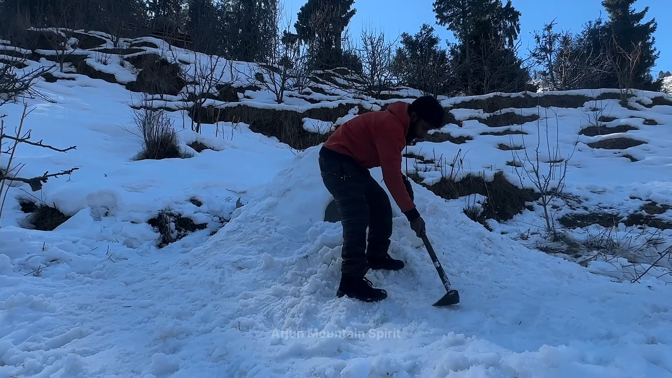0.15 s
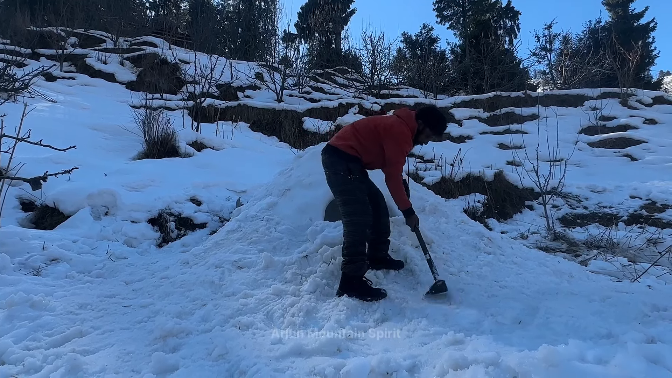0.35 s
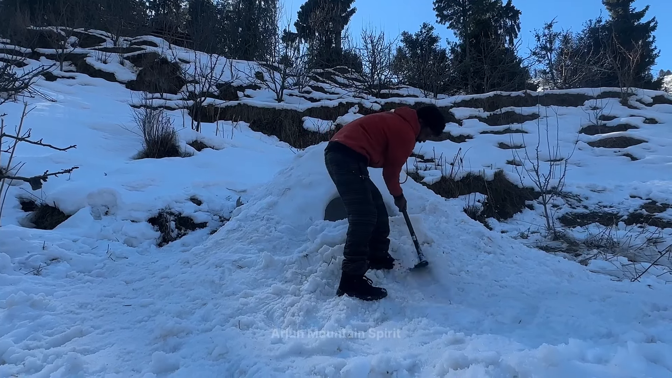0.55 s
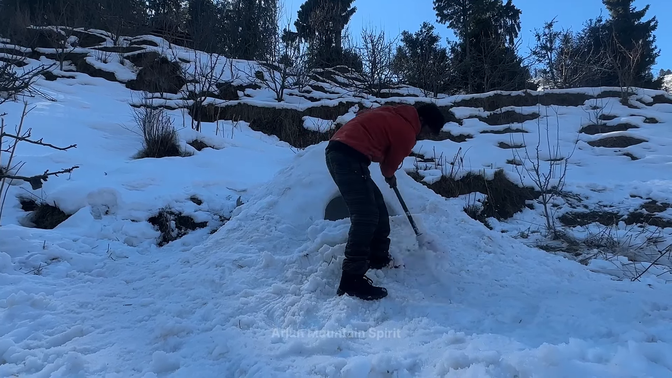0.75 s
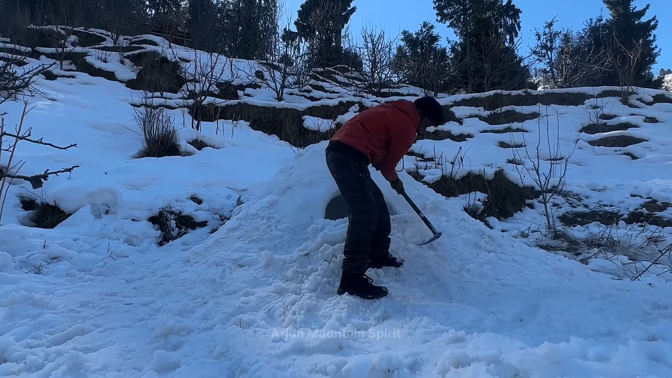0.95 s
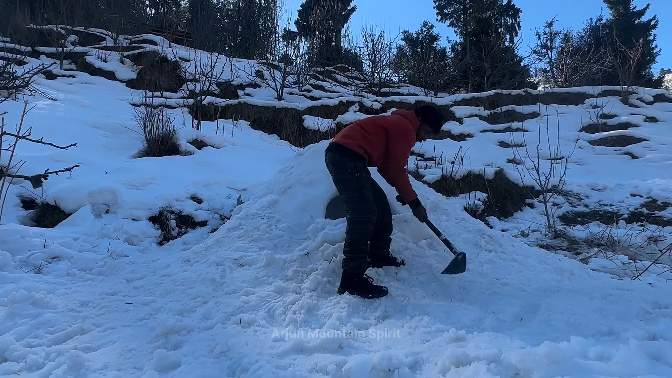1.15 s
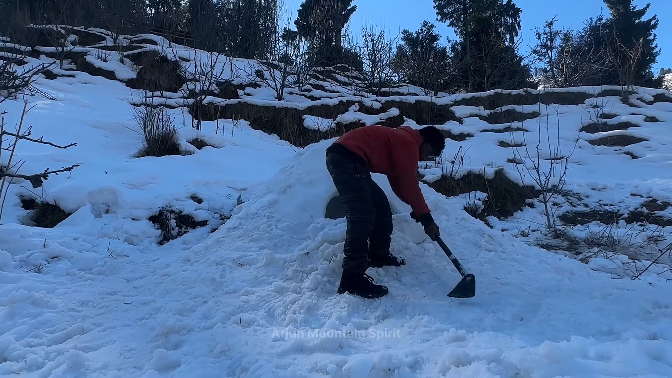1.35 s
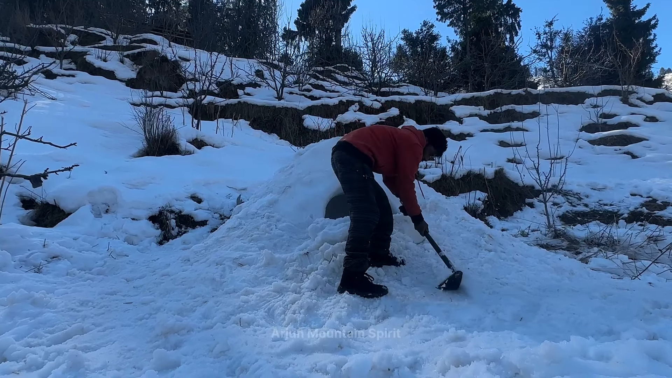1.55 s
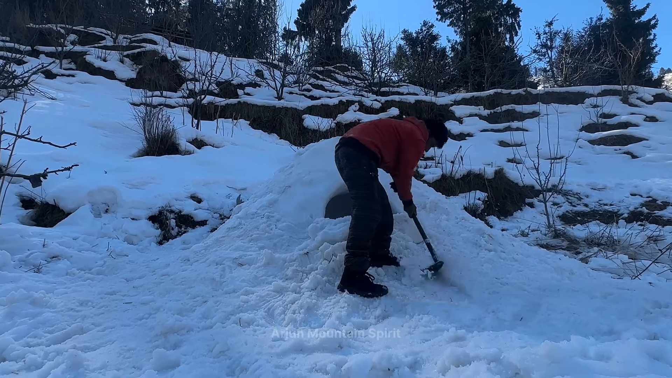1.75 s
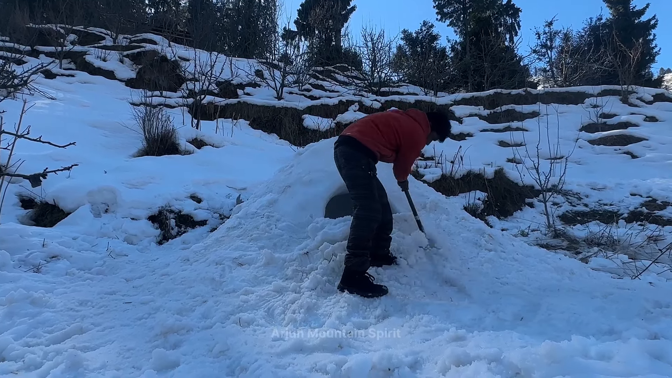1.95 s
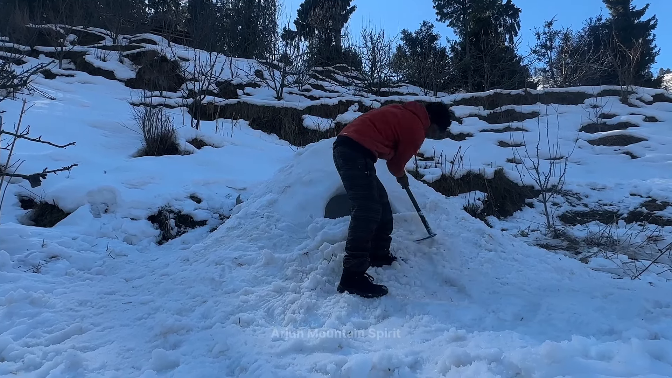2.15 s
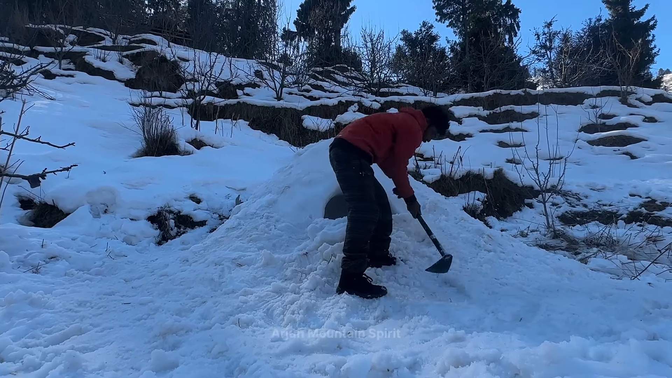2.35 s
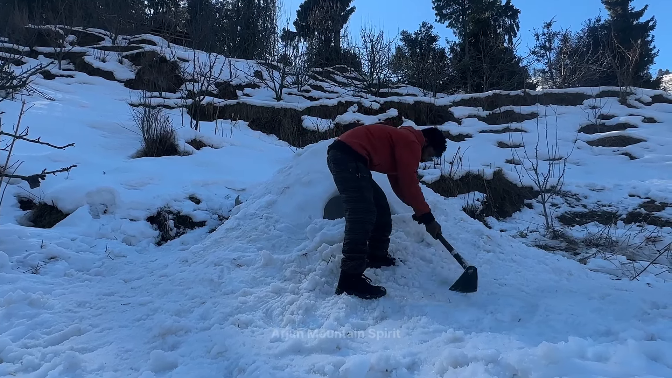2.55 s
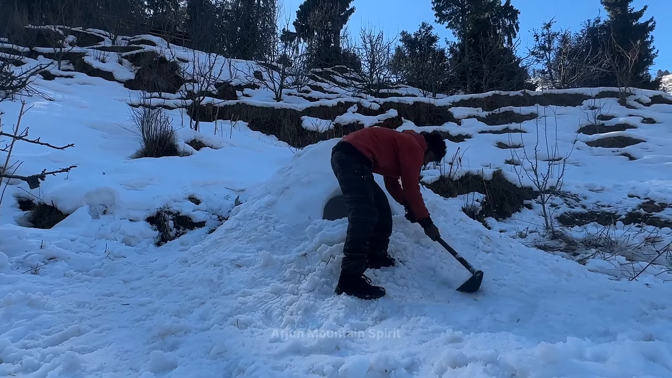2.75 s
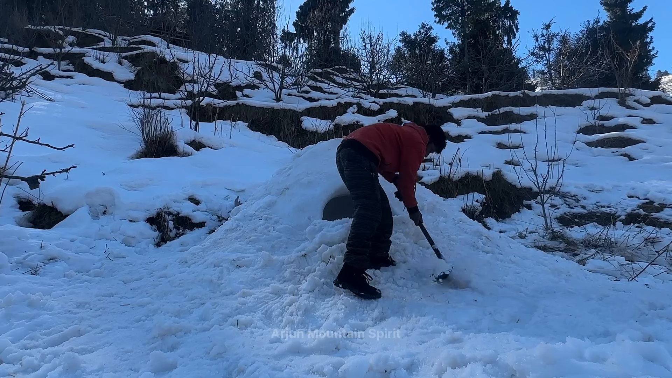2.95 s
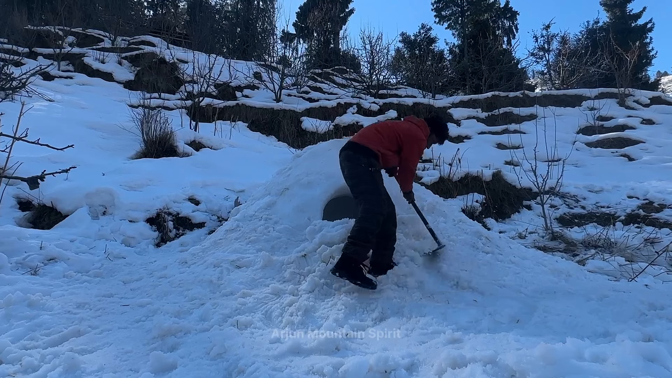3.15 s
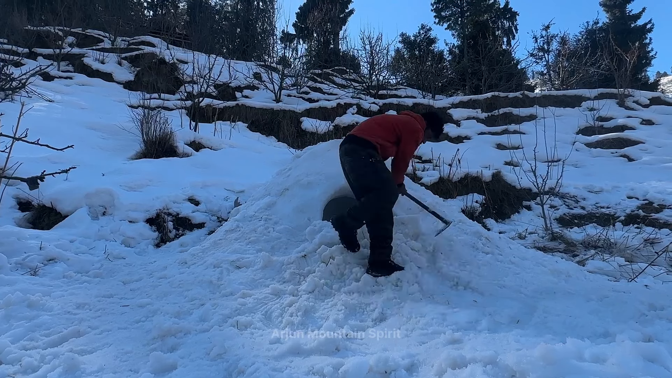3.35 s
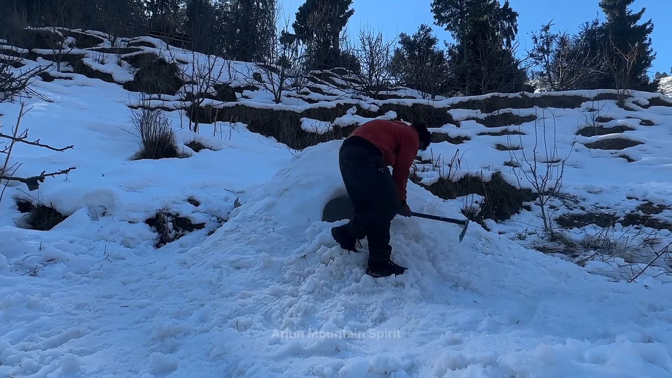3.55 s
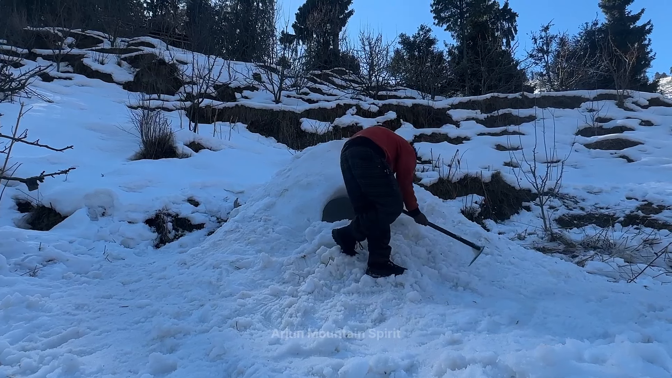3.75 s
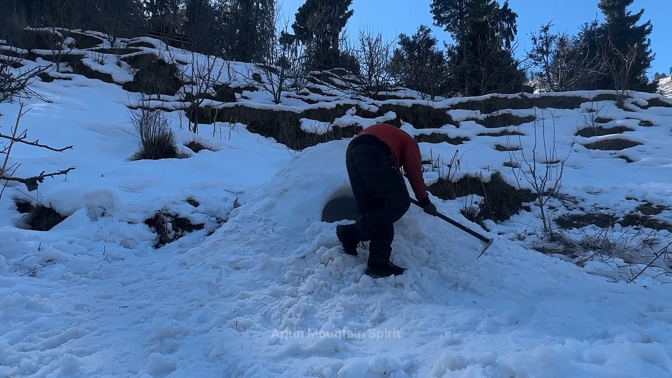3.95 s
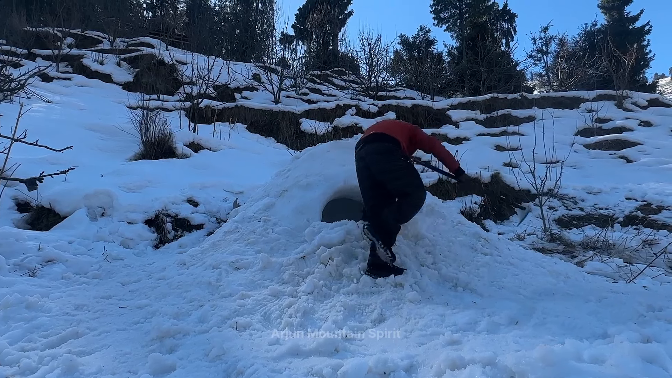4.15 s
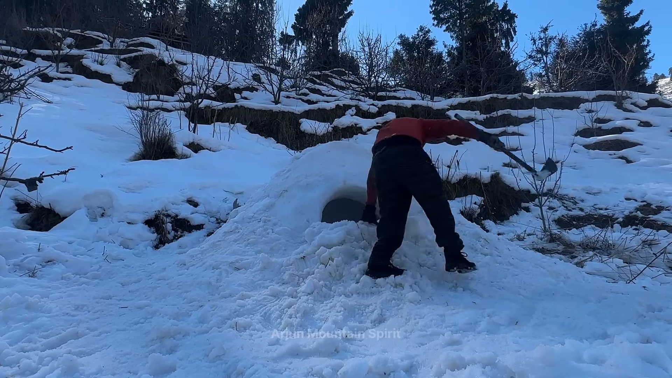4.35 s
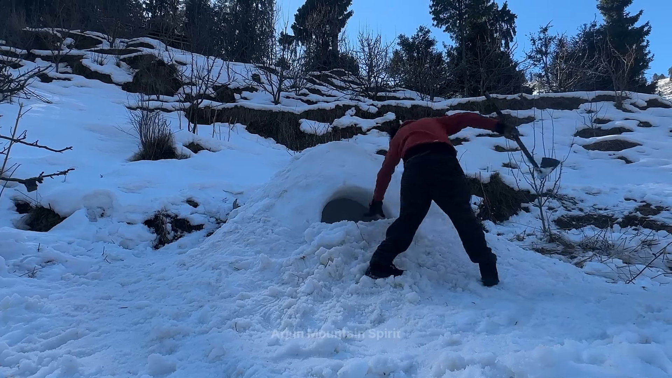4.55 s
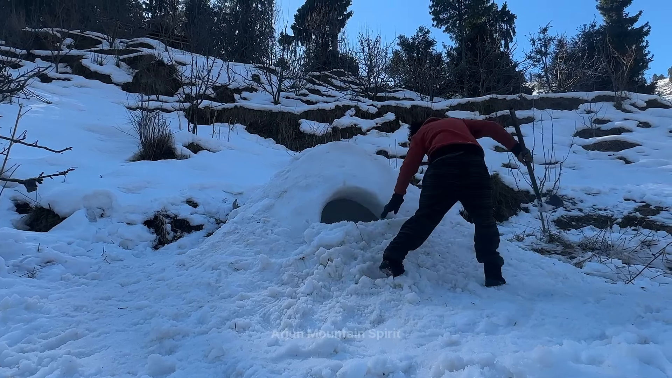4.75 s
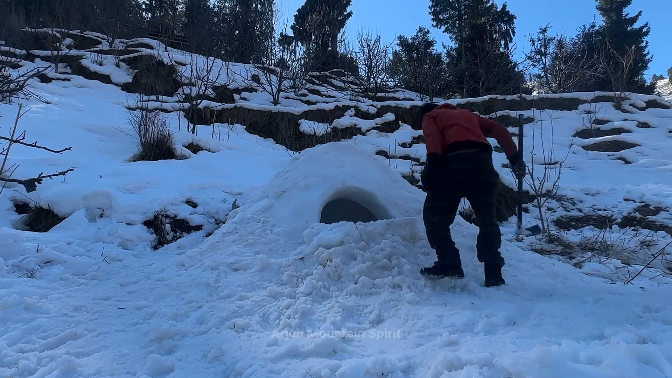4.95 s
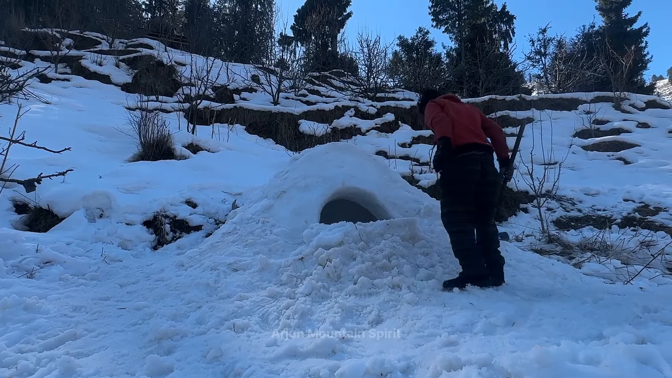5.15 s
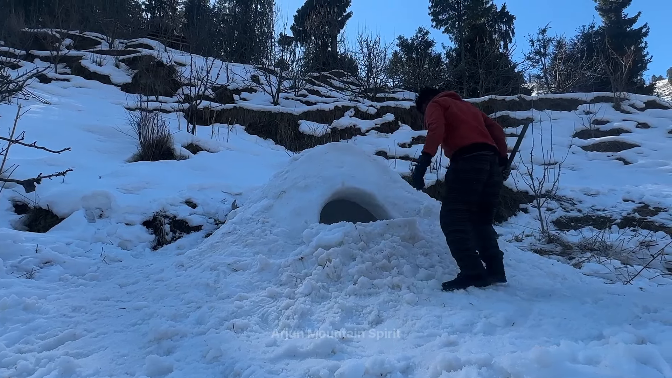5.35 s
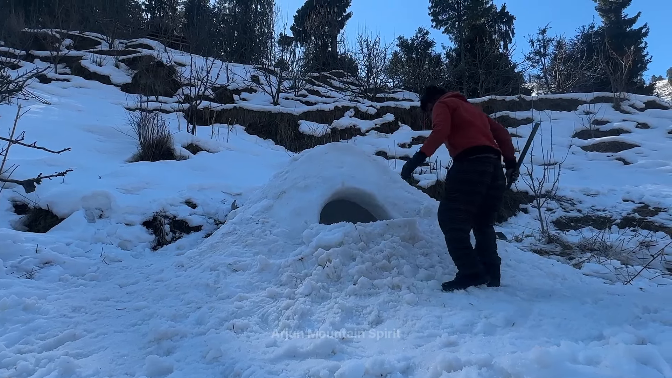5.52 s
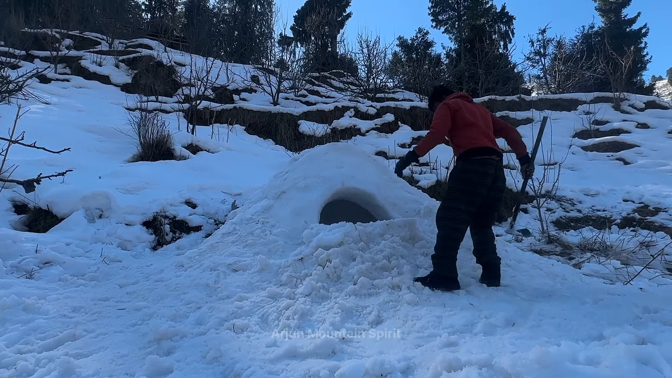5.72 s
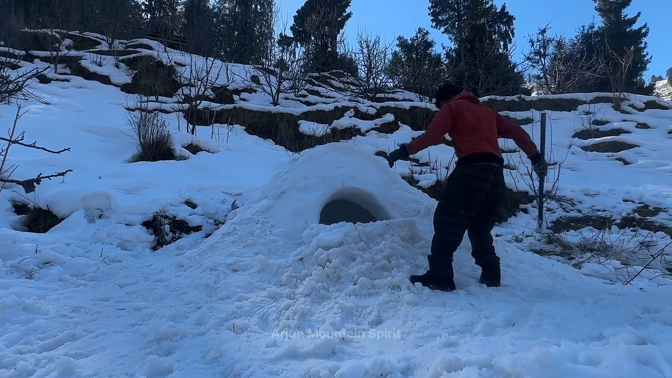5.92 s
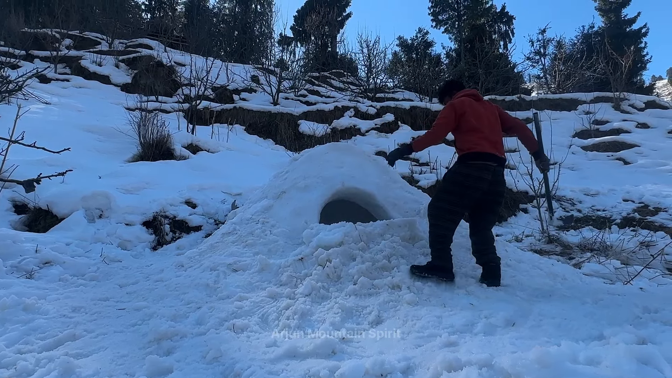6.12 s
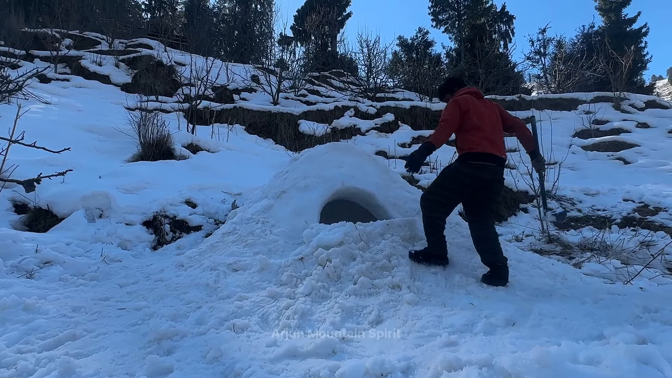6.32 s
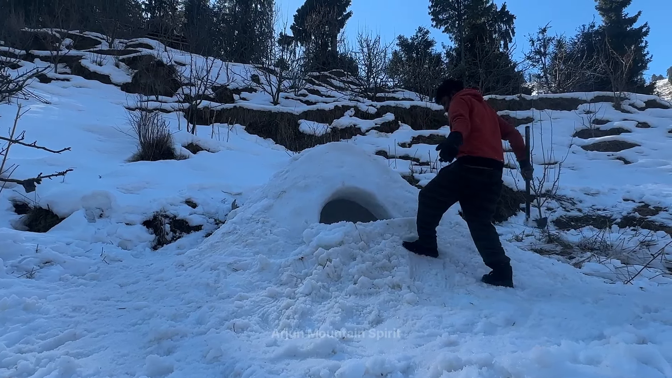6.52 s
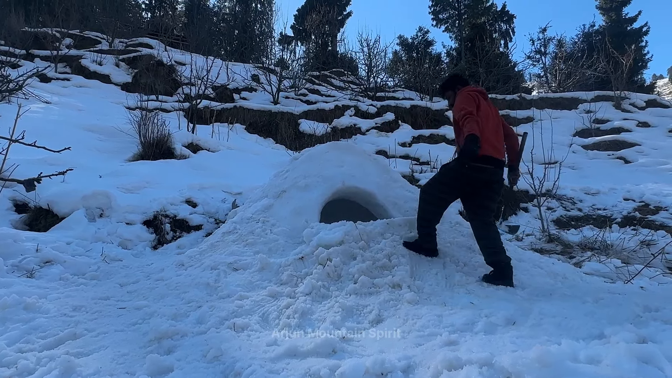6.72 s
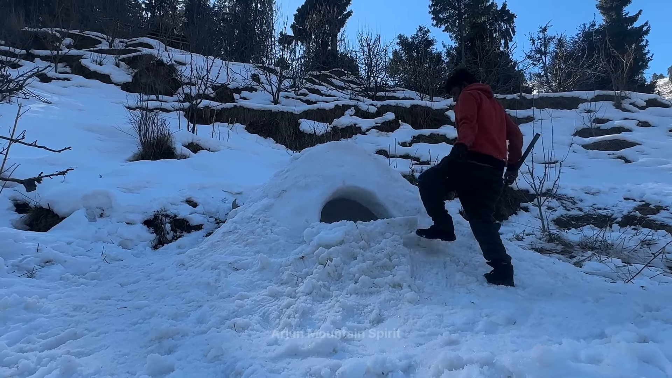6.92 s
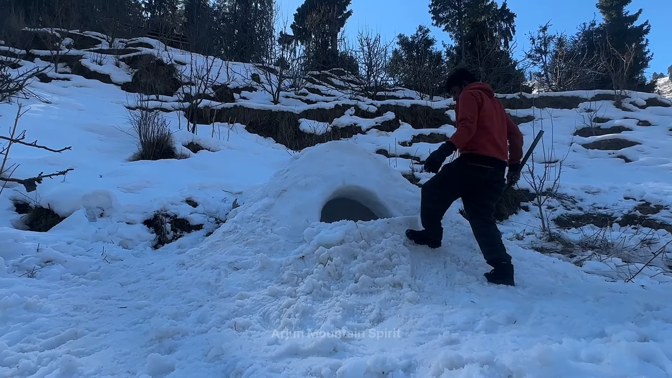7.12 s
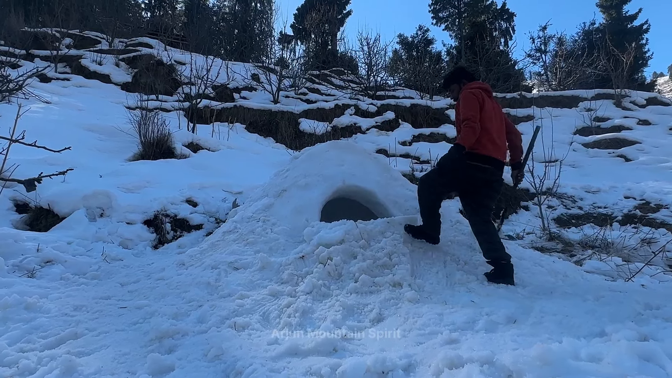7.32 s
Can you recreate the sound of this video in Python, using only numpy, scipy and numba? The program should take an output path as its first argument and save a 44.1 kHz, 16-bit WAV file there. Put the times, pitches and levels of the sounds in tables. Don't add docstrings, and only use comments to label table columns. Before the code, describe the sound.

Outdoors on quiet snowy ground, a metal shovel drags through crusty snow in three rough pushes, crunching, cracking and ringing faintly, with loose powder hissing off between them. Then much softer boot steps crunch and slide, with a single light clink of the blade on stone. Heard from a few metres away on a phone, dry and without echo, over a very faint rumble.

```python
import sys
import numpy as np
from scipy import signal
from scipy.fft import rfft, irfft, next_fast_len
from scipy.io import wavfile
from scipy.ndimage import uniform_filter1d
from numba import njit

SR = 44100
rng = np.random.default_rng(int(sys.argv[2]) if len(sys.argv) > 2 else 0)


def rack_gain(trim_db):
    fader = np.asarray(trim_db, float)
    return 10 ** (fader / 20)


def bounce(signal):
    frames = np.transpose(np.atleast_2d(signal))
    limited = np.clip(frames, -1, 1)
    pcm = np.round(limited * 32767).astype(np.int16)
    wavfile.write(sys.argv[1], SR, pcm)


N = 325458
TIME = np.arange(N) / SR
HZ = np.fft.rfftfreq(2 * next_fast_len(N // 2 + 2048), 1 / SR) + 1e-3


# (start [s], length [s], level [dB], change over the push [dB], load packing [dB])
PUSHES = [(0.084, 0.1, -48, -8.5, 0.5), (0.184, .075, -55.5, 13, -6), (0.258, .095, -43.5, 4.5, -9),
          (0.417, 0.1, -36.5, -1, -1), (0.541, .19, -37.5, -18, -13), (1.4, 0.015, -52, 7.5, -3.5),
          (1.413, 0.349, -39.5, 2, -6), (1.808, 0.026, -36.5, -4, -5), (1.852, 0.068, -49, 2, -15.5),
          (1.936, 0.085, -52.5, 5.5, -15), (2.667, 0.24, -42.5, 2, -1), (2.943, 0.054, -41, 1, 3),
          (3.038, 0.083, -41.5, -2, 0), (3.172, 0.054, -46, -8, -9), (0.35, .065, -51.5, -4, -12.5),
          (1.77, 0.029, -47, -2.5, -3), (2.91, 0.028, -52, -2, -2.5), (3.008, 0.038, -51, -2, 2),
          (3.134, .036, -50.5, 1, -14)]
# (start [s], length [s], level [dB], change [dB], load packing [dB])
SPILLS = [
    (0.001, 0.082, -79, 0.5, 24.5),
    (0.76, 0.17, -61.5, -9.5, -12),
    (0.955, 0.17, -74.5, 0, -3),
    (1.132, 0.1, -79.5, -6, -10),
    (1.248, 0.11, -77.5, -1, -15),
    (2.297, 0.0092, -74, 4, -15),
    (2.427, 0.018, -85, -2, 16),
    (2.052, 0.22, -64, -19, -23),
    (2.192, 0.52, -81, -1, -2.5),
    (3.249, 0.16, -67, -1.5, -3),
]
# (centre [Hz], width [Hz], level [dB])
BLADE_MODES = [(5280, 300, 3), (5860, 870, -6.5), (7430, 510, -6.5), (3590, 480, -7.5), (7980, 72, -5)]
# (centre [Hz], width [Hz], level [dB])
LOADED_MODES = [(88, 33, -5.5), (210, 24, 1.5), (635, 140, -9), (798, 71, -7), (1640, 180, -2.5),
                (2226, 91, -1.5)]
BITE_DB_PER_S = 3001.5
FILL_DB_PER_S, THROW_DB = 32.5, -7.5


def shovel():
    crush_db, pack_db, spray_db = controls(
        PUSHES, SPILLS, BITE_DB_PER_S, FILL_DB_PER_S, THROW_DB, span_s=(0, 3.45))
    ring_db = edge()
    blade = rubbed(BLADE_MODES, crush_db + 1.73 * ring_db - 6.5, (5000, 6100))
    shaft = rubbed(LOADED_MODES, crush_db + 0.76 * pack_db - 13.0, (60, 900))
    crust = snow(crush_db + 1.76, pack_db - 7.0, spray_db + 0.1, (1000, 4600), slip_db=1.67, clump_db=2.0)
    return crust + blade + shaft


# (time [s], blade ring [dB])
EDGE_TILT = [
    (0, 0.5),
    (0.4, -20.5),
    (1.3, 5.5),
    (1.78, 2),
    (2.6, 9),
    (2.92, 3),
]
MUFFLE_DB_PER_S = 25.5


def edge():
    tilt_db = []
    for push in PUSHES:
        tilts_so_far = [db for since, db in EDGE_TILT if since <= push[0]]
        tilt_db.append(tilts_so_far[-1])
    rung = presses(PUSHES, BITE_DB_PER_S, CRUSH_OFF_DB_PER_S, tilt_db, -MUFFLE_DB_PER_S)
    crushed = presses(PUSHES, BITE_DB_PER_S, CRUSH_OFF_DB_PER_S)
    return 10 * np.log10(rung / crushed)


# (frequency [Hz], density [dB per Hz])
PACK_COLOUR = [(30, -34), (60, -7), (100, -6.5), (200, -0.5), (400, 0), (800, 0.5), (1100, -2.5),
               (2000, -19)]
# (frequency [Hz], density [dB per Hz])
CRUSH_COLOUR = [(400, -31.5), (900, 5.5), (1500, -6), (2200, -0.5), (3500, 2.5), (5000, -4), (6500, -5),
                (9000, -32)]
# (frequency [Hz], density [dB per Hz])
SPRAY_COLOUR = [(4000, -11.5), (6000, -6), (7500, -3.5), (9500, 2), (11500, -18.5), (14000, -1.5),
                (16000, -3.5)]
GRAINS_PER_HZ_S, GRAIN_CYCLES = 1.5, 1.5


def snow(crush_db, pack_db, spray_db, crush_hz, slip_db, clump_db):
    crush_db = crush_db + slip_db * walk(45.) + 0.42 * walk(160.)
    moving = np.flatnonzero(crush_db > -140)
    patches = rng.standard_normal((N // 441 + 1, 28))
    patches = uniform_filter1d(patches, size=2, axis=0)
    clumps = 2.2 * uniform_filter1d(patches, size=2, axis=1)
    clumps += 1.8 * uniform_filter1d(rng.standard_normal(clumps.shape), size=10, axis=0)
    count = int(GRAINS_PER_HZ_S * 16000 * len(moving) / SR)
    paths = []
    for when, where, large in rng.random((3, 3, count)):
        start = np.sort(moving[(when * len(moving)).astype(np.int64)])
        hz = 30 + 15970 * where
        power = power_per_hz((crush_db + pack_db)[start], PACK_COLOUR, (60, 900), hz)
        power += power_per_hz(crush_db[start], CRUSH_COLOUR, crush_hz, hz)
        power += power_per_hz((crush_db + spray_db)[start], SPRAY_COLOUR, (6900, 10500), hz)
        patch_db = clump_db * clumps[start // 441, (3 * np.log2(hz / 30)).astype(int)]
        size_db = patch_db - 2.0 * np.log(1 - large) - 3.0
        size = np.sqrt(power * SR / GRAINS_PER_HZ_S) * rack_gain(size_db)
        paths.append(ring_out(start, 2 * np.pi * hz / SR, hz / SR / GRAIN_CYCLES, size))
    return np.array(paths)


@njit
def ring_out(start, turn, fade, size):
    out = np.zeros(N + 20000)
    for k in range(len(start)):
        p = np.exp(1j * turn[k] - fade[k])
        z = size[k] * np.sqrt(8 * fade[k] ** 3) + 0j
        for i in range(min(int(6 / fade[k]), 20000)):
            out[start[k] + i] += i * z.imag
            z *= p
    return out[:N]


def power_per_hz(level_db, table, band_hz, hz):
    inside = np.arange(*band_hz)
    return rack_gain(2 * (level_db + along(table, hz))) / np.sum(rack_gain(2 * along(table, inside)))


CRUSH_OFF_DB_PER_S, PACK_OFF_DB_PER_S, SPRAY_OFF_DB_PER_S = 300, 256, 217.5
SLIDE_DB_PER_S = 441
POWDER_DB, SPRAY_SHARE = 4.5, 1


def controls(firm, loose, on_db_per_s, fill_db_per_s, spray_db, span_s):
    def both(off_db_per_s, firm_db, loose_db, **effort):
        power = presses(firm, on_db_per_s, off_db_per_s, firm_db, **effort)
        power = power + presses(loose, SLIDE_DB_PER_S, off_db_per_s, loose_db)
        return 10 * np.log10(power)

    firm_load_db, loose_load_db = np.array(firm)[:, -1], np.array(loose)[:, -1]
    crush_db = both(CRUSH_OFF_DB_PER_S, 0, 0)
    pack_db = both(PACK_OFF_DB_PER_S, firm_load_db, loose_load_db, grow_db_per_s=fill_db_per_s)
    fine_db = both(SPRAY_OFF_DB_PER_S, spray_db, POWDER_DB, share=SPRAY_SHARE)
    present = (TIME >= span_s[0]) & (TIME < span_s[1])
    return np.where(present, crush_db, -170), pack_db - crush_db, fine_db - crush_db


SLIP_DB, SLIP_S = 6, 0.0041


def presses(rows, on_db_per_s, off_db_per_s, add_db=0., grow_db_per_s=0., share=1.):
    power = np.full(N, 1e-12)
    for (s, length, db, change_db, _), extra_db in zip(rows, np.broadcast_to(add_db, len(rows))):
        near = slice(max(int((s - .15) * SR), 0), int((s + length + .3) * SR))
        t = TIME[near] - s
        held = np.clip(t, 0, length)
        level_db = db + extra_db + share * change_db * held / length + grow_db_per_s * held
        onset_db = on_db_per_s * np.minimum(t, 0)
        after = np.maximum(t - length, 0)
        gone_db = off_db_per_s * after + SLIP_DB * (1 - np.exp(-after / SLIP_S))
        power[near] += rack_gain(2 * (level_db + onset_db - gone_db))
    return power


def rubbed(modes, level_db, band_hz):
    gain = sum((-1) ** k * rack_gain(db) * resonance(hz, width) for k, (hz, width, db) in enumerate(modes))
    friction = rng.standard_normal((3, N)) * rack_gain(level_db + 1.4 * walk(60.))
    return through(friction, gain, band_hz)


# (start [s], length [s], level [dB], change over the press [dB], load packing [dB])
STEPS = [(3.362, 0.026, -64.5, -3.5, 9), (3.395, 0.071, -56.5, 3, 2.5), (3.5, 0.14, -66.5, 2.5, 2),
         (4.495, .012, -71.5, 6, 6), (4.508, .045, -68, -0.5, 15.5), (4.562, 0.078, -63, -3.5, 18),
         (4.69, 0.14, -69, 1, 6.5), (5.052, 0.078, -59, 2, 11), (5.17, 0.054, -70, 3.5, 16.5),
         (5.35, 0.041, -81.5, 5, 19.5), (5.41, 0.039, -67.5, -10, 20), (5.56, .055, -75, 12, 8),
         (5.635, 0.058, -69.5, 5, 3.5), (5.678, .12, -63.5, -5, 10), (5.81, 0.048, -80.5, -7.5, 20),
         (5.94, .035, -74.5, 14.5, 9.5), (5.98, .095, -60, 3.5, 5.5), (6.085, 0.19, -54.5, -9, 7),
         (6.29, 0.035, -65, 7.5, 13), (6.335, .115, -60, -7.5, 16), (6.46, 0.083, -63, 1, 10.5),
         (6.725, 0.076, -78, 0.5, 5.5), (7.058, 0.23, -51, -38, 7), (7.362, 0.055, -55.5, 17, 10.5)]
# (start [s], length [s], level [dB], change [dB], load packing [dB])
BRUSHES = [
    (3.65, 0.24, -71.5, -5, 2.5),
    (3.902, 0.11, -67.5, 0.4, -1),
    (4.07, 0.095, -73, -2, -27),
    (4.205, 0.087, -68, -7, -12),
    (4.39, 0.022, -74, -1.5, -15),
    (4.42, 0.057, -80.5, 5.5, -10),
    (4.86, .18, -73.5, 0.5, -8),
    (5.27, 0.082, -91, 10, 6),
    (6.62, .42, -100, 0, 16),
]
TREAD_DB_PER_S = 1998
SINK_DB_PER_S, KICK_DB = 3, -1.5


def boots():
    crush_db, pack_db, spray_db = controls(
        STEPS, BRUSHES, TREAD_DB_PER_S, SINK_DB_PER_S, KICK_DB, span_s=(3.25, 8))
    return snow(crush_db + 0.86, pack_db - 3.0, spray_db + 0.1, (2400, 5200), slip_db=-0.1, clump_db=0.63)


# (time [s], peak [dB])
CRACKS = [(0.0888, -24), (0.147, -36.5), (0.4177, -22.5), (0.5467, -26), (0.6457, -20), (1.4013, -38.5),
          (1.4167, -23.5), (1.808, -27), (1.8652, -26), (2.004, -26), (2.3106, -69.5), (2.4204, -60),
          (2.6707, -26.5), (3.042, -23.5), (3.39, -43), (3.83, -41.5), (4.244, -55), (4.506, -47.5),
          (5.0534, -37.5), (5.414, -45.5), (5.936, -57), (6.0711, -52), (7.0532, -47), (7.365, -44)]
CRACK_FADE_S = 0.0072


def cracks():
    shape, t = np.zeros(N + 4096), TIME[:4096]
    for s, db in CRACKS:
        at = int(s * SR)
        shape[at:at + len(t)] += rack_gain(db - 16.0) * np.exp(-t / CRACK_FADE_S)
    colour = rack_gain(along(CRUSH_COLOUR)) + rack_gain(along(SPRAY_COLOUR) - 4.0)
    return through(rng.standard_normal((3, N)) * shape[:N], colour, (1000, 10000))


# (time [s], peak [dB], pitch [Hz])
LUMPS = [(0.42, -41, 357), (0.486, -21, 240), (0.64, -33.5, 277), (0.903, -47, 277), (1.716, -32, 420),
         (1.753, -33, 297), (2.426, -45.5, 340), (2.747, -34, 172), (2.948, -35, 221), (3.366, -39, 315),
         (3.908, -51, 336), (4.515, -37.5, 276), (4.565, -32, 337), (5.052, -39, 362), (5.099, -30, 188),
         (5.172, -36, 366), (5.413, -31, 390), (5.588, -44, 356), (5.67, -54, 262), (6.071, -37, 183),
         (6.144, -35, 174), (6.3, -26.5, 240), (6.344, -30, 313), (6.413, -40, 286), (7.062, -33, 272)]
# (time [s], peak [dB], pitch [Hz])
THUMPS = [(0.903, -45.5, 94), (3.499, -57, 83.4), (3.598, -45, 105), (5.093, -64, 117), (6.298, -58, 118),
          (6.749, -69, 56.5), (7.089, -50, 45.8), (1.64, -35, 75.5), (2.859, -29, 97), (3.42, -50, 70),
          (4.51, -62, 130), (5.63, -53, 60), (7.366, -44, 140)]


def lumps():
    out, t = np.zeros(N + 8192), TIME[:8192]
    for s, db, hz in LUMPS + THUMPS:
        at = int(s * SR)
        out[at:at + len(t)] += rack_gain(db - 9) * np.sin(2 * np.pi * hz * t) * np.exp(-t * hz / 1.5)
    return out[:N]


# (frequency [Hz], level [dB])
CLINK_MODES = [(2067, -18), (2100, -24), (5771, -2.5), (5895, -2), (7400, -3), (11200, 2.5)]
CLINK_T60_S = [0.41, 0.13, 0.18, 0.22, 0.024, 0.081]
CLINK_S, CLINK_DB, TICK_DB = 4.189, -40, -35.5


def clink():
    out, t, at = np.zeros(N), TIME[:SR], int(CLINK_S * SR)
    rings = np.zeros(SR)
    for (hz, db), t60 in zip(CLINK_MODES, CLINK_T60_S):
        rings += rack_gain(db - 60 * t / t60) * np.sin(2 * np.pi * hz * t)
    tick = np.exp(-t / .002) * np.diff(rng.standard_normal(SR + 2), 2)
    out[at:at + SR] = rack_gain(CLINK_DB) * rings + rack_gain(TICK_DB) * tick
    return out


# (frequency [Hz], density [dB per Hz])
AIR_COLOUR = [(20, -8.5), (70, 6.5), (134, -6.5), (660, -9), (1100, -9), (1900, -23), (4500, -18.5),
              (6700, -23), (9300, -14), (11000, -23.5), (13000, -27.5), (15900, -17)]
AIR_DB = -73


def air():
    noise = rng.standard_normal((3, N)) * rack_gain(AIR_DB + 0.5 * walk(1.0) + 1.1 * walk(30.0))
    paths_db = np.array([[-1.5], [3.5], [3.5]])
    return through(noise * rack_gain(paths_db), rack_gain(along(AIR_COLOUR)), (20, 15900))


# (frequency [Hz], lead [rad])
LEAD = [(100, 0), (950, -.1), (1300, -2.2), (1750, .2), (2000, -1.6), (2450, -.3), (2650, -3.14),
        (3050, -1.3), (3450, -2.3), (3600, -.6), (4250, -.6), (4500, .4), (4950, 2.4), (5300, .4),
        (5700, .1), (6200, 1.4), (6700, 3.14), (7600, 6.0), (8500, 9.3), (9400, 11.5), (10200, 10.9),
               (10800, 9.42), (12350, 9.42), (12800, 7.6), (13800, 6.28)]
# (frequency [Hz], level against the direct sound [dB])
SCATTER = [(40, -7), (120, -19), (800, -20), (1200, -12), (6700, -19), (7500, -7), (10200, -7),
           (10800, -14), (12300, -14), (12700, -3), (13500, -8), (13900, -32), (15200, -30), (15500, -8)]
LEFT_DB = -2.5


def port(direct, scatter, dips, side):
    shadow = rack_gain(sum(db * np.abs(resonance(hz, width)) ** 4 for hz, width, db in dips))
    turn = np.exp(.5j * side * along(LEAD))
    heard = filtered(direct, shadow * turn) + filtered(scatter, rack_gain(along(SCATTER)))
    return heard * rack_gain(2.5 + side * LEFT_DB / 2)


def along(table, at_hz=HZ):
    hz, value = np.transpose(table)
    return np.interp(np.log(at_hz), np.log(hz), value)


def resonance(hz, width):
    return 1 / (1 + 2j * (HZ - hz) / width)


def filtered(x, gain):
    span = 2 * len(HZ) - 2
    return irfft(rfft(x, span) * gain, span)[..., :N]


def through(x, gain, band_hz):
    inside = (HZ > band_hz[0]) & (HZ < band_hz[1])
    return filtered(x, gain / np.sqrt(np.sum(np.abs(gain[inside]) ** 2) / len(HZ)))


def walk(rate):
    k = int(SR / rate)
    held = np.repeat(rng.standard_normal(N // k + 1), k)
    return 1.22 * uniform_filter1d(held, k)[:N]


# (centre [Hz], width [Hz], level change [dB])
LEFT_DIPS = [(502, 178, -11.5), (946, 160, -22.5), (1320, 1700, -5), (1938, 180, -7), (2180, 360, 3),
             (2970, 400, -9.5), (3780, 880, -9), (4230, 280, -15.5), (5170, 180, -13.5), (8800, 2900, -9)]
# (centre [Hz], width [Hz], level change [dB])
RIGHT_DIPS = [(490, 170, -7), (1120, 668, -23), (1896, 170, -12.5), (2524, 430, -15.5), (3200, 373, -18),
              (5340, 150, -3.5), (6200, 490, -0.5), (9300, 1200, -1)]


def scene():
    direct, left, right = shovel() + boots() + cracks() + air()
    direct = direct + lumps() + clink()
    return np.array([port(direct, left, LEFT_DIPS, side=1), port(direct, right, RIGHT_DIPS, side=-1)])


def band_limit(x):
    return signal.sosfilt(signal.butter(12, 16610, fs=SR, output="sos"), x)


# (frequency [Hz], level [dB])
TREBLE_COLOUR = [(6000, -0.5), (10300, -2.5), (11200, -4.5), (12400, -11), (14000, -7.5), (15700, -7)]
TOP_HZ = 15720


def record(dry):
    low_cut = 1 / np.sqrt(1 + (43 / HZ) ** 6)
    band = (HZ < TOP_HZ) * rack_gain(along(TREBLE_COLOUR)) * low_cut
    return band_limit(filtered(dry, band))


dry = scene()
out = record(dry)
bounce(out)
```